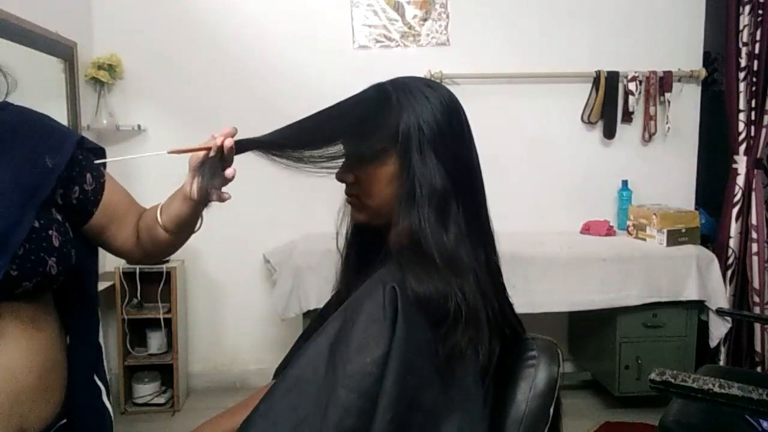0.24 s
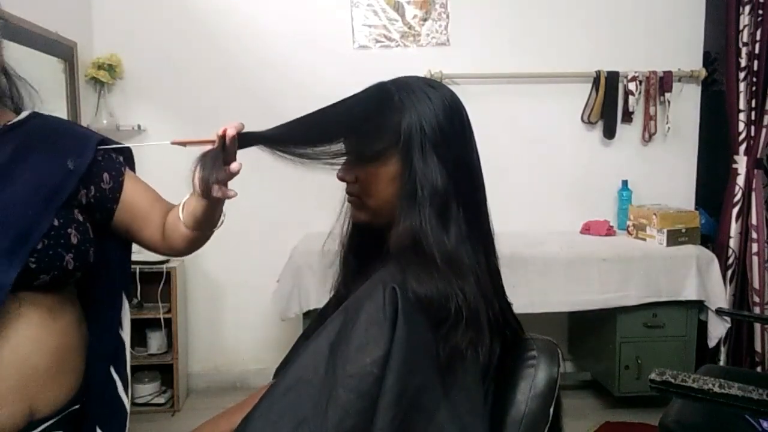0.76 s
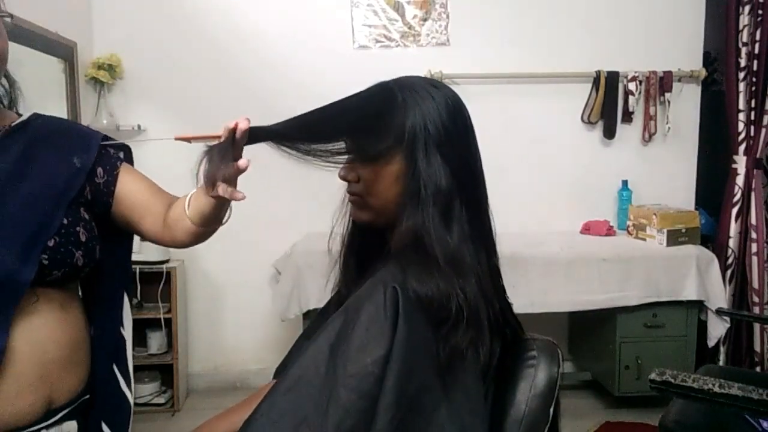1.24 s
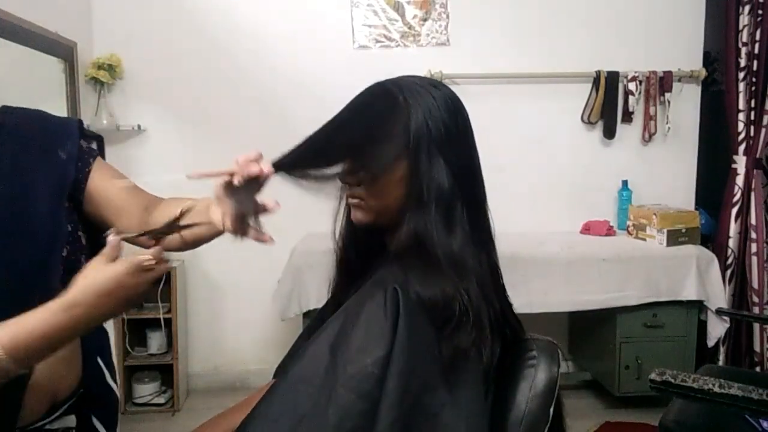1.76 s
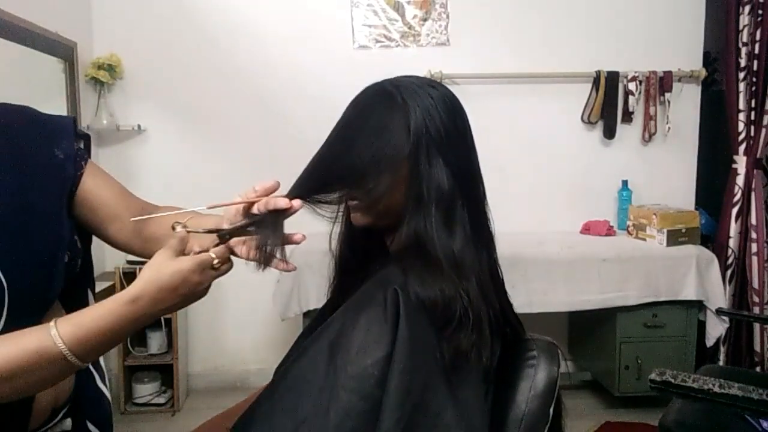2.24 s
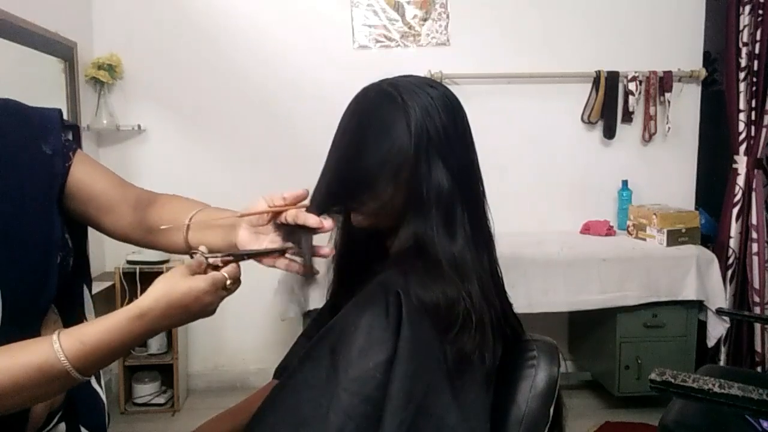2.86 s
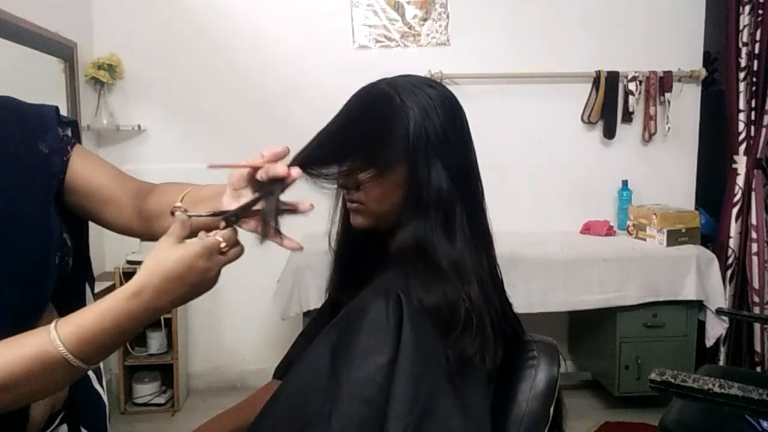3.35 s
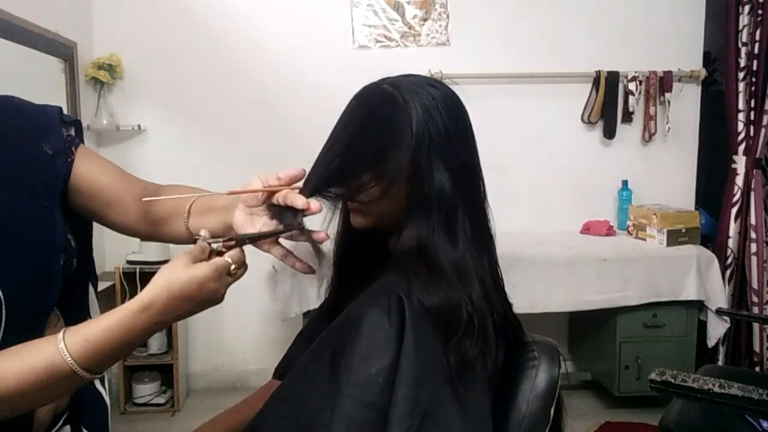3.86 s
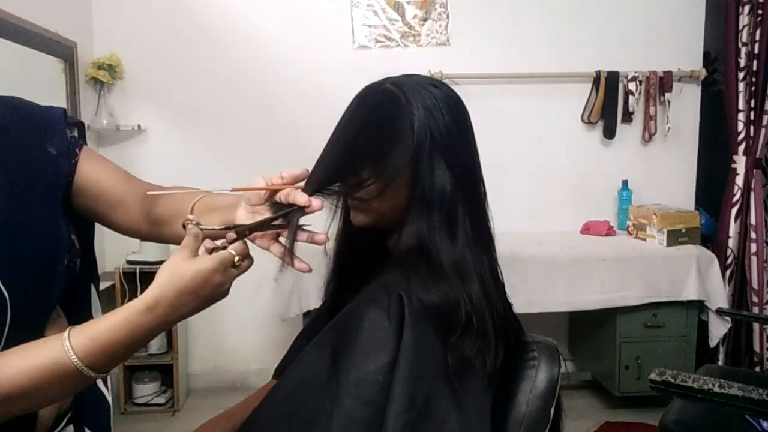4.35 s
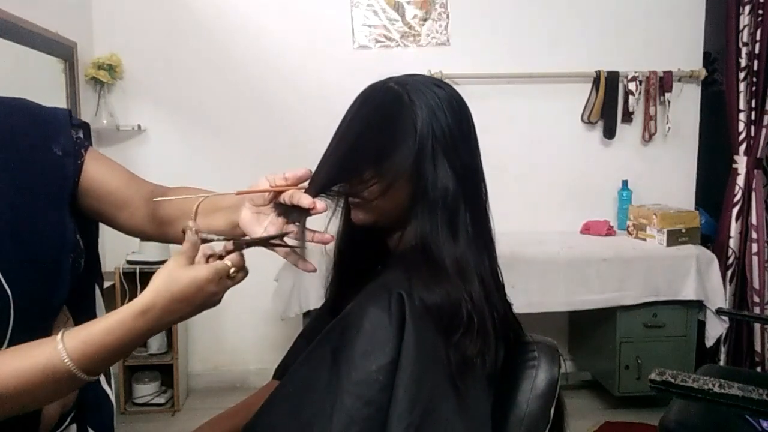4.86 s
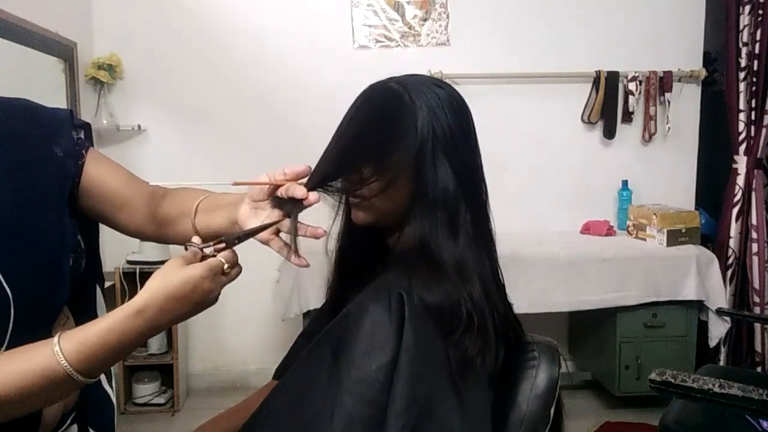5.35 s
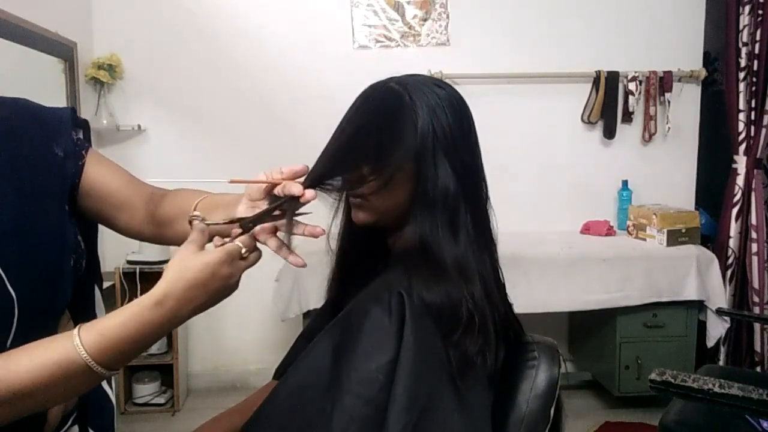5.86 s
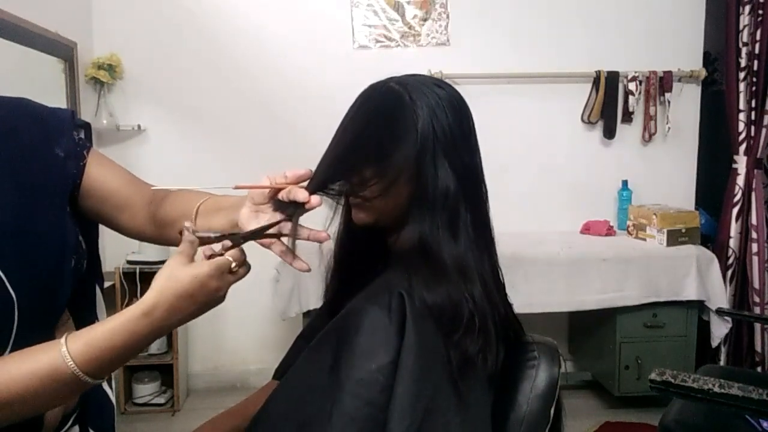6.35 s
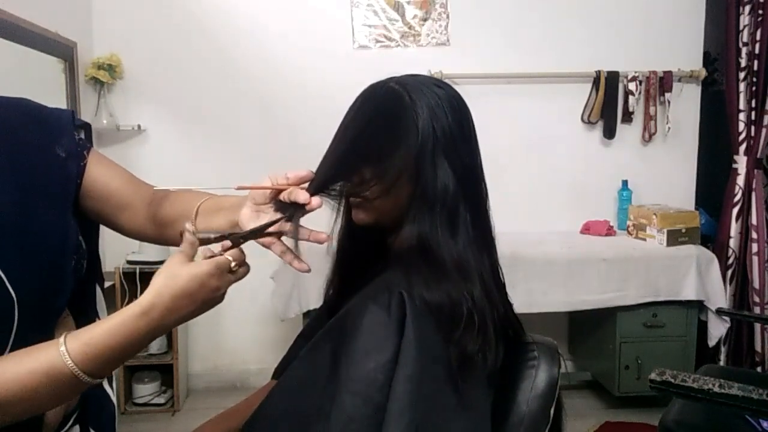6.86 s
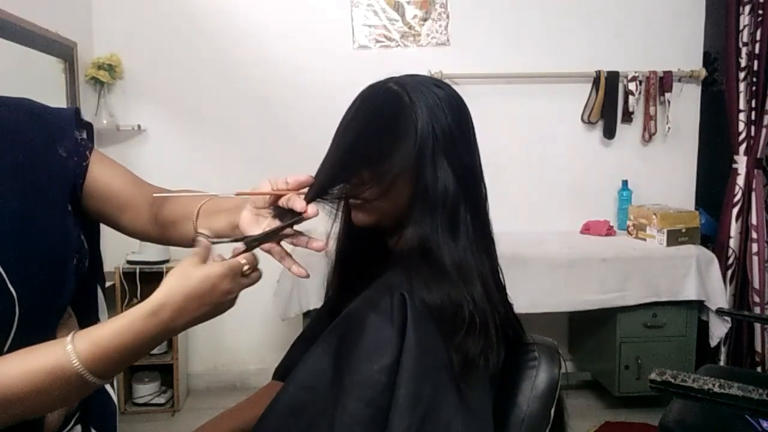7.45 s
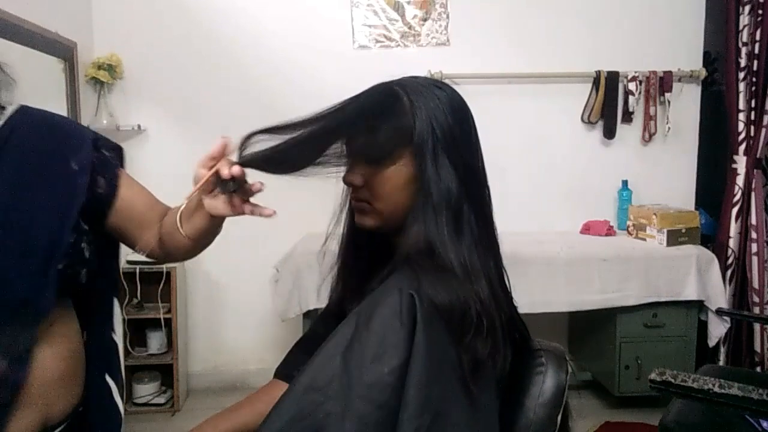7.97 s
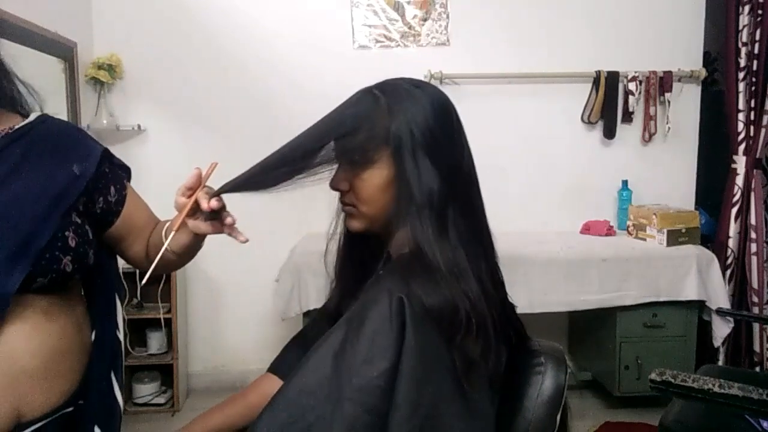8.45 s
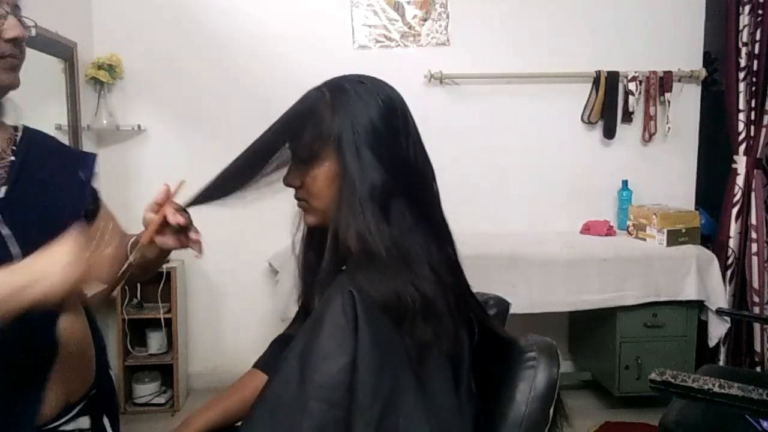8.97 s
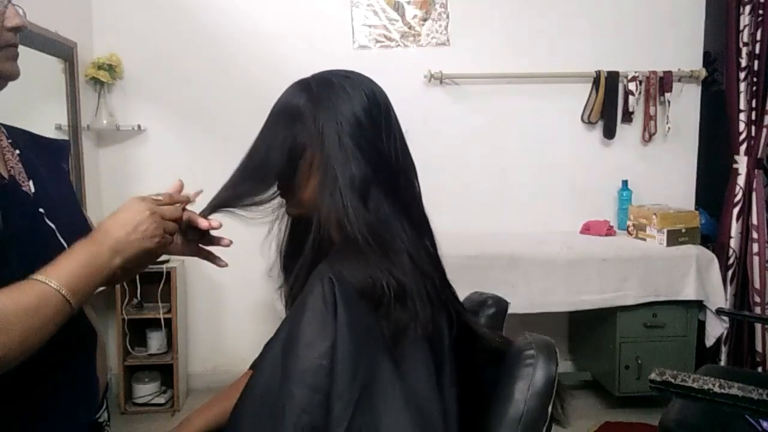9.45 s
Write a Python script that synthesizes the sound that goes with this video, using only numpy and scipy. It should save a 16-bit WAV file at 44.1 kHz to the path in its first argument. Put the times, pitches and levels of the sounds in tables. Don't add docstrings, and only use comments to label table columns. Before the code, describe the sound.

Metal scissors clatter on a hard surface, then snip crisply through hair with soft hiss and faint squeals, ending in a loud clack over fan hum.

```python
import sys
import numpy as np
from scipy import signal
from scipy.fft import rfft, irfft, next_fast_len
from scipy.io import wavfile

SR = 44100
rng = np.random.default_rng(int(sys.argv[2]) if len(sys.argv) > 2 else 0)


def invert_db(level):
    return 10 ** (np.asarray(level, dtype=float) / 20)


def materialize(psi):
    bounded = np.clip(np.atleast_2d(psi).T, -1, 1)
    quanta = np.round(bounded * 32767).astype(np.int16)
    wavfile.write(sys.argv[1], SR, quanta)


N = 428211
LEAD = 4410


def rms_one(x):
    return x / np.sqrt(np.mean(x ** 2) + 1e-20)


def in_time(rows):
    s, *columns = np.transpose(rows)
    return [np.interp(np.arange(N) / SR, s, c) for c in columns]


def at_hz(points, hz):
    table_hz, values = np.transpose(points)
    return np.interp(np.log(hz), np.log(table_hz), values)


def drift(rate):
    r = np.exp(-80 * np.pi * rate / SR)
    slow = signal.lfilter([1], [1, -2 * r, r * r], rng.standard_normal(N // 40 + 2002))[2000:]
    return np.interp(np.arange(N) / 40, np.arange(len(slow)), rms_one(slow))


def band(x, low_hz, high_hz):
    edges = [low_hz, min(high_hz, .45 * SR)]
    return signal.sosfilt(signal.butter(2, edges, "band", fs=SR, output="sos"), x)


def wavering(x, edges, depth_db, rate):
    out = 0
    for k, (low, high) in enumerate(zip(edges, edges[1:])):
        out = out + (-1) ** k * band(x, low, high) * invert_db(depth_db * drift(rate))
    return out


def coloured(size, spectrum):
    size_fft = next_fast_len(size)
    hz = np.arange(size_fft // 2 + 1) * SR / size_fft + 1
    shaped = rfft(rng.standard_normal(size_fft)) * invert_db(at_hz(spectrum, hz))
    return rms_one(irfft(shaped, size_fft)[:size])


def resonances(x, modes):
    out = 0
    for k, (hz, width, level_db) in enumerate(modes):
        r = np.exp(-np.pi * width / SR)
        poles = [1, -2 * r * np.cos(2 * np.pi * hz / SR), r * r]
        out = out + (-1) ** k * invert_db(level_db) * signal.lfilter([1 - r, 0, r - 1], poles, x)
    return rms_one(out)


def swells(rows, rest_db, edge_db, bend, stop_db_per_s):
    t = np.arange(0, N / SR + .002, .001)
    s, rise, fall, db = np.array(rows).T[:, :, None]
    span, away = np.where(t < s, rise, fall).clip(.004), abs(t - s)
    sink = edge_db * np.minimum(away / span, 1) ** bend
    level = db - sink - stop_db_per_s * np.maximum(away - span, 0)
    return np.interp(np.arange(N) / SR, t, np.maximum(level.max(axis=0), rest_db))


def bursts(times, level_db, t60s, rise_s):
    out, t = np.zeros(N + LEAD + SR // 4), np.arange(SR // 4) / SR
    for s, db, t60, rise in zip(times, level_db, t60s, rise_s + np.zeros(len(times))):
        at = LEAD + round(s * SR)
        out[at:at + len(t)] += invert_db(db - 60 * t / max(t60, .004)) * (1 - np.exp(-t / rise))
    return out[:N + LEAD]


def struck(times, level_db, modes, spread_db, rattle_s, top_db=0):
    at, out = LEAD + np.round(np.asarray(times) * SR).astype(int), np.zeros(N + LEAD)
    chance, white = rng.standard_normal((len(at), len(modes))), rng.standard_normal(N + LEAD)
    fade = invert_db(-60 / (rattle_s * SR))
    for k, (hz, mode_db, t60) in enumerate(modes):
        clicks = np.full(N + LEAD, 1e-18)
        top_mode = hz > 13500
        clicks[at] = invert_db(level_db + mode_db + top_db * top_mode + spread_db * chance[:, k])
        rattle = white * signal.lfilter([np.sqrt(1 - fade ** 2)], [1, -fade], clicks)
        r, w = invert_db(-60 / (t60 * SR)), 2 * np.pi * hz / SR
        out += signal.lfilter([0, np.sin(w)], [1, -2 * r * np.cos(w), r * r], rattle)
    return out


# (time [s], drone level [dB])
FAN = [(0.0, -56), (.3, -59), (.8, -52.5), (1.7, -54.5), (2.05, -53), (2.4, -54.5), (3.5, -50.5),
       (4.4, -49), (4.57, -51.5), (4.7, -48.5), (5.3, -50.5), (6.3, -47.5), (8.3, -49), (8.6, -53.5),
       (9.71, -53.5)]
# (frequency [Hz], density [dB per Hz])
DRONE = [(290, -26), (500, -6.5), (530, 1), (687, -11.5), (771, 1.5), (1200, -2), (1460, -1.5), (2900, -17),
         (3500, -33), (6500, -52), (11000, -120)]
# (frequency [Hz], width [Hz], level [dB])
ROOM_MODES = [(286.7, 24.5, 1), (331.4, 33, -1), (443.7, 47, 0.5), (487.8, 28, 0.5), (578, 55, 3),
              (760, 67, 0), (932, 17, -2.5)]
# (frequency [Hz], width [Hz], level [dB])
RUMBLE_MODES = [(55, 9.4, -2), (108.1, 8.8, 0), (170.6, 24, -6.5), (231, 12, -15.5), (33, 14, -11)]
# (fullest at [s], rise [s], fall [s], level [dB])
DROP_BOOMS = [
    (.5, 0.041, 0.1, -48),
    (8.88, 0.037, 0.11, -39),
]
# (fullest at [s], rise [s], fall [s], level [dB])
SHAKES = [(0.0, .1, .15, -56.5), (.5, 0.06, 0.1, -51.5), (1.0, 0.12, 0.6, -59.5), (2.05, 0.27, 0.37, -63.5),
          (2.95, 0.37, 0.24, -63), (3.55, 0.28, 0.98, -59), (4.57, 0.19, 0.11, -52),
          (4.9, 0.23, 0.51, -58.5), (6.16, 0.71, 0.56, -57), (7.33, 0.65, 0.5, -56.5),
          (8.03, 0.54, 0.26, -55), (8.9, 0.25, 0.2, -55), (9.75, .3, .1, -61.5)]
# (frequency [Hz], width [Hz])
NOTCHES = [(78, 35), (372, 28), (520, 79), (685, 31)]


def fan():
    booms_db = swells(DROP_BOOMS, -90, edge_db=9.5, bend=0.86, stop_db_per_s=94)
    drone_db = np.maximum(in_time(FAN)[0], booms_db)
    rumble_db = swells(SHAKES, rest_db=-67.5, edge_db=5, bend=0.9, stop_db_per_s=39.5)
    low = resonances(rng.standard_normal(N), ROOM_MODES[:4]) * invert_db(2.8 * drift(8.1))
    high = resonances(rng.standard_normal(N), ROOM_MODES[4:]) * invert_db(2.0 * drift(8.3))
    air = wavering(coloured(N, DRONE), 400 * 2 ** np.arange(0, 4.1, .33), depth_db=1.8, rate=8)
    rumble = resonances(rng.standard_normal(N), RUMBLE_MODES) * invert_db(2.5 * drift(6))
    out = invert_db(drone_db) * (0.57 * low + 0.52 * high + 0.58 * rms_one(air)) + invert_db(rumble_db) * rumble
    for hz, width in NOTCHES:
        out = signal.lfilter(*signal.iirnotch(hz, hz / width, fs=SR), out)
    return out


def puffs():
    puffs_per_s, puff_db, puff_cycles = 90, -8, 24
    strength = invert_db(3.5 * rng.exponential(1, N).clip(0, 3))
    born = (rng.random(N) < puffs_per_s / SR) * strength + 1e-18
    dealt, out = rng.integers(0, 24, N), 0
    for k, hz in enumerate(np.geomspace(420, 1900, 24)):
        r = invert_db(-60 * hz / (puff_cycles * SR))
        poles = [1, -2 * r * np.cos(2 * np.pi * hz / SR), r * r]
        soft_start = signal.lfilter([1, 0, -1], poles, born * (dealt == k))
        tones = rms_one(signal.lfilter([1], poles, soft_start))
        out = out + tones * invert_db(-5.5 * np.log2(hz / 420))
    return invert_db(in_time(FAN)[0] + puff_db) * rms_one(out)


# (frequency [Hz], level [dB], t60 [s])
BLADES = [(4900, -17, .03), (5620, -17, .03), (6500, -17, .03), (7660, -11, .04), (8790, -2, .06),
          (9700, -4, .03), (10500, -10, .04), (11420, 0, .07), (12500, -9, .04), (13200, -9, .04),
          (13860, -3, .06), (14020, 0, .07), (14200, -4, .05)]
# (frequency [Hz], density [dB per Hz])
HISS = [(2940, -41), (5000, -16), (6360, -11), (7410, 0.5), (9860, 0), (12400, -9.5), (13700, -10),
        (14300, -10), (16200, -12.5)]
# (fullest at [s], rise [s], fall [s], level [dB])
HISS_SWELLS = [(1.35, .2, 0.049, -57.5), (1.52, 0.012, 0.1, -66), (1.68, 0.025, 0.39, -69.5),
               (1.97, 0.041, 0.37, -63.5), (2.325, 0.014, 0.089, -60.5), (2.56, 0.15, 0.18, -61),
               (2.97, 0.22, 0.22, -54), (3.19, .06, 0.11, -58.5), (3.45, 0.068, 0.17, -62.5),
               (3.66, .04, 0.074, -62), (3.92, 0.14, 0.2, -57.5), (4.13, 0.0095, 0.23, -55),
               (4.46, .08, .1, -61.5), (4.75, 0.096, .06, -57.5), (4.92, 0.066, 0.14, -56),
               (5.14, 0.11, 0.17, -55), (5.36, 0.07, 0.73, -60), (5.69, 0.049, 0.11, -60),
               (5.89, 0.013, 0.24, -62.5), (6.16, 0.041, 0.14, -59.5), (6.306, 0.063, 0.25, -53.5),
               (6.48, .03, 0.123, -55), (6.64, 0.036, 0.068, -60), (6.875, 0.093, 0.13, -52),
               (7.02, 0.033, 0.15, -56), (7.235, 0.022, 0.088, -60), (7.38, 0.088, 0.095, -53),
               (7.54, 0.053, 0.059, -59), (7.685, 0.017, .04, -62.5), (7.77, 0.047, 0.2, -56),
               (7.96, 0.053, 0.31, -56)]
# (fullest at [s], rise [s], fall [s], level [dB], dull level [dB])
HANDLING = [
    (0.0, 0.043, 0.22, -48, -63),
    (.5, 0.15, 0.24, -46, -43),
    (.72, .05, 0.09, -55, -46),
    (.95, 0.084, 0.32, -63, -72.5),
    (8.3, 0.061, 0.13, -52, -52),
    (8.63, .025, 0.11, -47.5, -53),
    (8.78, 0.36, 0.037, -57.5, -64),
    (8.9, .08, 0.291, -49, -47),
    (9.25, 0.19, 0.14, -55, -48),
    (9.51, 0.024, 0.23, -50.5, -52),
]


def rubbing():
    rest_db, rest_dull_db = -80, -79
    hiss_db = swells(HISS_SWELLS, rest_db, edge_db=10.0, bend=1.4, stop_db_per_s=450)
    hands = np.array(HANDLING)
    hands_db = swells(hands[:, :4], rest_db, edge_db=9.5, bend=1.0, stop_db_per_s=257)
    bright_db = np.maximum(hiss_db, hands_db)
    cloth_db = swells(hands[:, [0, 1, 2, 4]], rest_dull_db, edge_db=8, bend=1.3, stop_db_per_s=300)
    dull_db = np.maximum(-69.5 + 1.05 * (hiss_db + 62.0), cloth_db)
    grain = invert_db(1.6 * drift(60) + 2.2 * drift(14))
    blade_modes = [(hz, 200, db - 4 * (hz > 13500)) for hz, db, t60 in BLADES]
    singing = resonances(rng.standard_normal(N), blade_modes)
    singing = singing * invert_db(5.0 * drift(9) + .8 * (hiss_db + 58))
    flecks = wavering(coloured(N, HISS), 2800 * 2 ** np.arange(0, 2.7, .3), depth_db=3.0, rate=11)
    bright = rms_one(rms_one(flecks) + .16 * singing)
    dull = rms_one(band(band(rng.standard_normal(N), 2600, 7300), 2600, 6500))
    dull_db = np.minimum(dull_db - 4.5, bright_db - 3.5)
    return grain * (invert_db(bright_db) * bright + invert_db(dull_db) * dull)


# (frequency [Hz], t60 [s])
ROOM_T60 = [(100, 0.31), (1000, 0.71), (4000, 0.51), (9000, 0.41), (16000, 0.28)]


def room(x):
    t, tail = np.arange(SR) / SR, 0
    edges = 60 * 2 ** np.arange(0, 8.6, .5)
    for low, high in zip(edges, edges[1:]):
        fall = invert_db(-60 * t / at_hz(ROOM_T60, low * 1.52))
        tail = tail + band(rng.standard_normal(SR), low, high) * fall
    tail = tail * np.clip((t - .004) / 0.002, 0, 1)
    return signal.fftconvolve(x, tail / np.sqrt(np.sum(tail ** 2)))[:len(x)]


# (frequency [Hz], density [dB per Hz])
CRACK = [(2650, -33), (4500, -18), (5400, -7.5), (7250, -10), (8840, 1), (10400, -5), (11900, -4),
         (13100, -9), (14300, -3.5), (16200, -20.5)]


def steel_crack(white, s, db, mid_db, t60, rise, ring_db, top_db):
    middle = bursts(s, db + mid_db - 1.0, t60, rise) * rms_one(band(white, 2140, 5400))
    body = bursts(s, db - 6, t60, rise)
    front = bursts(s, db - 14.0, t60 / 11.0, rise / 3)
    chatter_db, chatter_hz = 3.5, 180
    chatter = rms_one(signal.lfilter(*signal.butter(2, chatter_hz, fs=SR), white[::-1]))
    crack = (body + front) * coloured(N + LEAD, CRACK) * invert_db(chatter_db * chatter - 1.5)
    ring = struck(s + rise, ring_db + db - 16, BLADES, spread_db=2.5, rattle_s=.1, top_db=top_db)
    return middle + crack + ring


# (time [s], peak level [dB], low part [dB], middle part [dB], crack t60 [s])
KNOCKS = [(0.2354, -13, -27, -20, 0.02), (0.2945, -17, -17, -33, 0.051), (0.411, -20.5, -25, -27.5, 0.056),
          (0.4224, -14, -22, -21, 0.038), (0.4384, -21, -6.5, -22, 0.096),
          (0.4499, -5.5, -22.5, -9.5, 0.084), (0.476, -18, -25, -15, 0.05),
          (0.4894, -16, -20, -25.5, 0.056), (0.633, -16.5, -13.5, -5, 0.038),
          (0.9038, -33.5, -17, -19, 0.074), (0.9802, -14.5, -23, -31, 0.039),
          (1.0944, -33, -20, -27.5, 0.054), (8.2357, -42.5, -3.5, -2.5, 0.073),
          (8.8014, -20.5, -18, -27, 0.033), (8.8104, -6, -18, -14, 0.066), (8.8353, 2.5, -18.5, -18, 0.019),
          (8.8474, -12, -14.5, -8.5, 0.13)]
# (top blade modes [dB], rise [s])
LANDINGS = [(-0.5, 0.00098), (-5.5, .002), (-2, .004), (3, 0.0016), (5, 0.0027), (3.5, .002), (4, .0015),
            (5.5, 0.002), (3.5, 0.0022), (-1, 0.0043), (-0.5, 0.0009), (0.5, .0012), (-5, .0012),
            (0, 0.0013), (0, 0.00099), (-5, .0006), (-5, 0.00051), (-6, .002)]
# (frequency [Hz], level [dB], t60 [s])
TRAY = [(575, -3, .1), (850, -3, .1), (1060, -3, .07), (1480, 0, .1), (1850, -4, .05), (2700, -5, .05),
        (3800, -6, .06)]


def tray_knocks(white):
    earlier_drop = (-.06, -20, -7.0, 0.71, 0.093)
    s, db, low_db, mid_db, t60 = np.transpose([earlier_drop] + list(KNOCKS))
    top_db, rise = np.transpose(LANDINGS)
    thud = bursts(s, db + low_db + 4, 1.81 * t60, 0.0033) * rms_one(band(white, 490, 2800))
    tray = struck(s + .002, db + low_db - 10, TRAY, spread_db=4, rattle_s=.08)
    table = rms_one(band(band(white, 120, 400), 120, 400))
    boom = bursts(s + 0.015, db + low_db - 12.0, 2.9 * t60, 0.0091) * table
    ring_db = np.where(s > 0, -1.5, -12.5)
    crack = steel_crack(white, s, db, mid_db, t60, rise.clip(.0003), ring_db, top_db)
    return thud + tray + boom + crack


# (time [s], peak level [dB], middle part [dB], loudest pitch [Hz])
SNIPS = [(0.1027, -36, -9, 11000), (1.319, -41.5, -23, 8370), (2.323, -48, -18, 8710),
         (2.4189, -48.5, -16, 8400), (2.5212, -43.5, -21, 9000), (3.1366, -29.5, -18, 9400),
         (3.1762, -28.5, -25, 14160), (3.4271, -47, -22.5, 8440), (3.6481, -48.5, -17, 7760),
         (4.033, -31.5, -18, 13200), (4.1321, -32, -30, 11900), (4.701, -48, -30, 11500),
         (4.8215, -15, -22.5, 13100), (5.0075, -34.5, -26, 10400), (5.1928, -29.5, -43, 9740),
         (5.3457, -39, -24, 10000), (5.3682, -32, -24, 10700), (5.5039, -31.5, -16, 13900),
         (5.655, -40, -14, 9000), (6.2587, -52, -25, 11100), (6.4573, -26.5, -19.5, 10400),
         (6.993, -30, -20, 11650), (7.4001, -27.5, -16.5, 7700), (7.7822, -27.5, -15.5, 8100),
         (7.9168, -25.5, -27, 11900), (7.9314, -31, -27, 11700), (7.9785, -31, -28, 8920),
         (8.0038, -23, -20, 12800), (8.1958, -40, -23, 9600), (8.5913, -24.5, -28, 9500)]


def snips(white):
    at, peak_db, mid_db, pitches = np.transpose(SNIPS)
    each = np.ones(len(at))
    fall = .033 * each
    out = bursts(at, peak_db + mid_db - 1.0, fall, 0.00082) * rms_one(band(white, 1100, 2800))
    for s, db, hz, t60 in zip(at, peak_db, pitches, fall):
        i = LEAD + round(s * SR)
        size = min(SR // 8, N + LEAD - i)
        noise = white[i:i + size]
        piece = bursts([-LEAD / SR], [db - 9.5], [t60], 0.00073)[:size]
        out[i:i + size] += piece * rms_one(band(noise, .9 * hz, 1.1 * hz))
        chime = bursts([-LEAD / SR], [db - 23], [3 * t60], .001)[:size]
        out[i:i + size] += chime * rms_one(band(noise, .988 * hz, 1.012 * hz))
    crack = steel_crack(white, at, peak_db, mid_db, fall, .0012 * each, ring_db=-10.5, top_db=-3 * each)
    return out + crack


# (start [s], length [s], from [Hz], to [Hz], level [dB])
SQUEALS = [(2.758, .1, 11400, 11000, -62), (2.867, 0.11, 10000, 9600, -59), (2.967, 0.039, 9300, 8500, -49),
           (2.98, 0.033, 9600, 9460, -49), (2.95, 0.067, 11200, 11500, -54), (2.91, .05, 13800, 13800, -65),
           (3.135, 0.057, 8800, 8800, -54), (3.175, .06, 13950, 13900, -58),
           (3.812, 0.16, 11600, 10800, -59.5), (3.835, 0.092, 9400, 9100, -66),
           (3.95, .045, 9950, 9040, -47.5), (3.985, .05, 10600, 10900, -49), (3.98, .06, 13500, 13200, -56),
           (4.69, .08, 11400, 10900, -53.5), (4.783, 0.051, 10000, 8950, -44),
           (4.965, .045, 11700, 13300, -52), (5.372, .07, 10400, 10500, -57),
           (6.25, 0.066, 11500, 10600, -54), (6.301, 0.053, 10300, 9260, -46),
           (6.25, .11, 14000, 14000, -55), (6.81, .07, 14100, 14100, -57), (6.82, .04, 11500, 11300, -54),
           (6.855, 0.071, 10040, 8460, -50), (7.003, .015, 10000, 10100, -50),
           (7.005, .015, 8800, 8900, -51), (7.297, 0.064, 8900, 9300, -61), (7.335, .06, 11400, 11100, -54),
           (7.362, 0.057, 9970, 9500, -50), (7.33, .07, 14100, 14000, -59), (7.87, .04, 14000, 13800, -55),
           (7.915, 0.042, 11500, 11550, -51)]
# (start [s], length [s], frequency [Hz], level [dB])
RATTLES = [
    (.447, 0.069, 14000, -27),
    (.447, .04, 11450, -30),
    (.447, 0.026, 8790, -30),
    (8.809, 0.05, 11480, -27),
    (8.832, 0.037, 8800, -24),
    (8.85, .05, 1480, -32),
    (.294, .08, 1350, -46),
    (.294, 0.055, 2600, -50),
    (.65, .15, 1900, -51),
]


def squeals():
    out = np.zeros(N)
    undertone = .59
    steady = [(s, length, hz, hz, db) for s, length, hz, db in RATTLES]
    for s, length, from_hz, to_hz, db in list(SQUEALS) + steady:
        slip = rng.standard_normal((2, 2, SR // 4))
        u = np.clip(np.arange(SR // 4) / SR / length, 0, 1)
        turn = 2 * np.pi * np.cumsum(from_hz + (to_hz - from_hz) * u) / SR
        width_hz = 120 + .3 * abs(to_hz - from_hz)
        slip = signal.lfilter(*signal.butter(1, width_hz, fs=SR), slip)
        tone = rms_one(slip[0, 0] * np.cos(turn) + slip[0, 1] * np.sin(turn))
        under = rms_one(slip[1, 0] * np.cos(undertone * turn) + slip[1, 1] * np.sin(undertone * turn))
        tone = tone + invert_db(-12.5) * (to_hz < from_hz < 10400) * under
        i = round(s * SR)
        out[i:i + len(u)] += invert_db(db - 1.5) * np.sqrt(np.sin(np.pi * u).clip(0)) * tone
    return out


# (time [s], level [dB])
COMB_TAPS = [
    (.655, -28),
    (.7, -37),
    (.76, -42),
    (8.592, -26),
]
# (frequency [Hz], level [dB], t60 [s])
COMB = [(830, -7, .025), (1850, 0, .012), (2700, -6, .01), (4050, -2, .007), (5800, -3, .003),
        (9450, -7, .004)]


def comb_taps():
    return struck(*np.transpose(COMB_TAPS), COMB, spread_db=0, rattle_s=.08)


# (time [s], peak level [dB], loudest pitch [Hz], swell [s])
SHEARS = [(1.2, -47.5, 8600, 0.018), (2.75, -51, 11400, 0.02), (2.924, -51, 9500, 0.0074),
          (2.93, -58, 5840, .02), (2.949, -38, 9700, 0.009), (2.982, -36, 9650, 0.011),
          (3.015, -27.5, 12100, 0.0042), (3.55, -45.5, 8700, 0.011), (3.9, -39, 10900, 0.011),
          (3.954, -37.5, 9800, 0.028), (4.0, -39, 10900, 0.012), (4.773, -39, 9800, 0.031),
          (4.822, -22, 10000, 0.0031), (4.971, -42, 11500, .006), (4.984, -36.5, 9300, 0.01),
          (5.28, -54, 12000, .006), (5.484, -40, 9700, 0.0053), (6.29, -42, 10900, 0.027),
          (6.345, -36, 11200, 0.01), (6.335, -30, 9700, 0.009), (6.5, -50, 10200, 0.0051),
          (6.71, -46, 8300, 0.016), (6.83, -44, 13700, 0.017), (6.87, -40, 9800, 0.013),
          (6.889, -37.5, 9000, 0.012), (7.015, -47, 10000, 0.0044), (7.345, -50, 11200, 0.013),
          (7.385, -34, 7550, 0.0055), (7.51, -40, 8640, 0.012), (7.756, -41, 13800, 0.01)]


def shears():
    out, t = np.zeros(N + LEAD), np.arange(SR // 8) / SR
    for s, db, hz, swell in SHEARS:
        shape = ((t / swell) * np.exp(1 - t / swell)) ** 1.5
        grains = invert_db(2.5 * rng.standard_normal(len(t) // 40 + 1)).repeat(40)[:len(t)]
        strands = rng.standard_normal(len(t)) * grains
        crunch = .45 * rms_one(band(strands, .96 * hz, 1.04 * hz))
        crunch += .2 * rms_one(band(strands, .57 * hz, .62 * hz))
        crunch += 1.1 * rms_one(band(band(strands, 4500, 15000), 5500, 14500))
        i = LEAD + round((s - .004) * SR)
        out[i:i + len(t)] += invert_db(db - 15) * shape * crunch
    return out


# (time [s], level [dB])
HANDLE_CLINK = (7.919, -32)
# (frequency [Hz], level [dB], t60 [s])
HANDLES = [(3800, -5, 0.019), (7730, -5, .04), (11550, 3, 0.055), (13860, -2, .06), (15400, -1, .05)]


def handle_clink():
    s, db = HANDLE_CLINK
    return struck([s], db, HANDLES, spread_db=0, rattle_s=.08)


# (fullest at [s], rise [s], fall [s], level [dB])
SLIDE = [
    (8.07, 0.025, 0.45, -52.5),
    (9.24, 0.048, 0.18, -42),
    (9.33, 0.044, 0.055, -51),
    (9.59, 0.015, 0.062, -46.5),
    (9.65, 0.071, 0.16, -46.5),
]
# (frequency [Hz], width [Hz], level [dB])
SLIDE_BODY = [(1030, 250, -0.5), (1740, 200, 2.5), (2906, 140, -5), (4200, 250, -14.5), (4900, 200, -15)]


def slide():
    level_db = swells(SLIDE, -100, edge_db=10.0, bend=0.7, stop_db_per_s=220) + 1.5 * drift(45)
    return invert_db(level_db) * resonances(rng.standard_normal(N), SLIDE_BODY)


def scene():
    white = rng.standard_normal(N + LEAD)
    hits = tray_knocks(white) + snips(white) + comb_taps() + shears() + handle_clink()
    hits = (hits + invert_db(-6.5) * room(hits))[LEAD:]
    return (fan() + puffs() + rubbing() + hits + squeals() + slide())[None]


def band_limit(x):
    return signal.sosfilt(signal.butter(12, 16620, fs=SR, output="sos"), x)


def record(dry):
    hz = np.fft.rfftfreq(N, 1 / SR)
    mic_edge_hz, mic_edge_db, cutoff_hz = 14230, -7, 15780
    top_db = mic_edge_db * np.clip((hz - mic_edge_hz) / 150, 0, 1)
    top_db = top_db - 26 * np.clip((hz - cutoff_hz + 50) / 80, 0, 1)
    rounded = .8 * np.tanh(dry / .8)
    mix = irfft(rfft(rounded) * invert_db(top_db), N)
    mix = signal.sosfilt(signal.butter(2, 32, "high", fs=SR, output="sos"), mix)
    return band_limit(mix)


dry = scene()
out = record(dry)
materialize(out)
```